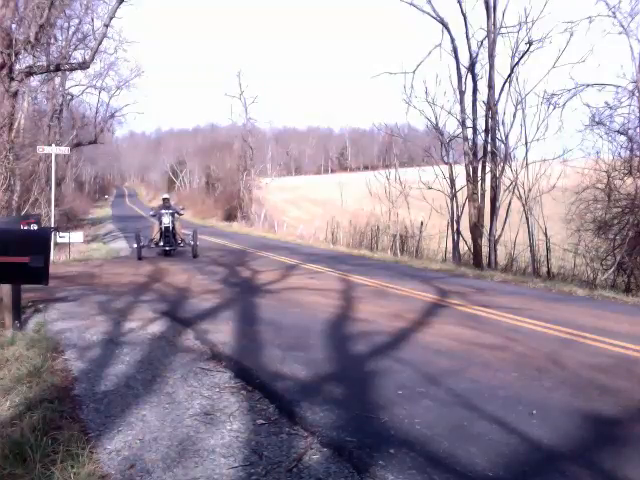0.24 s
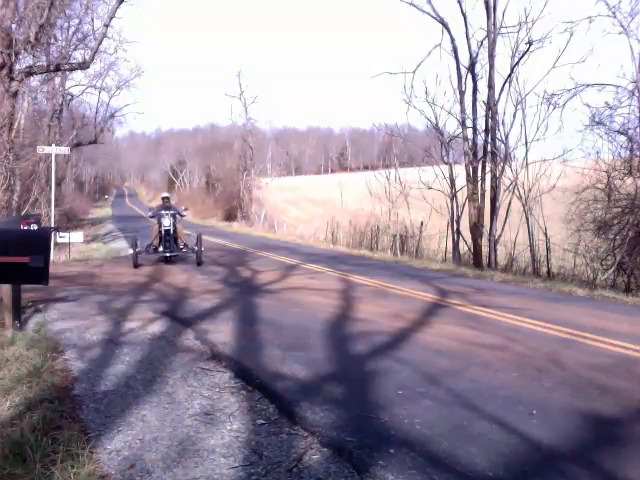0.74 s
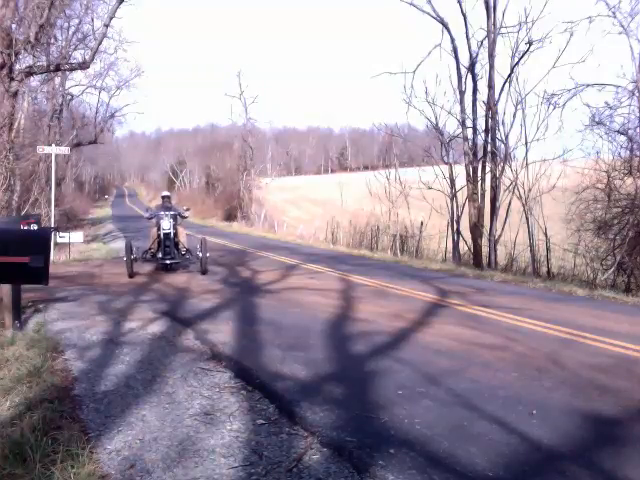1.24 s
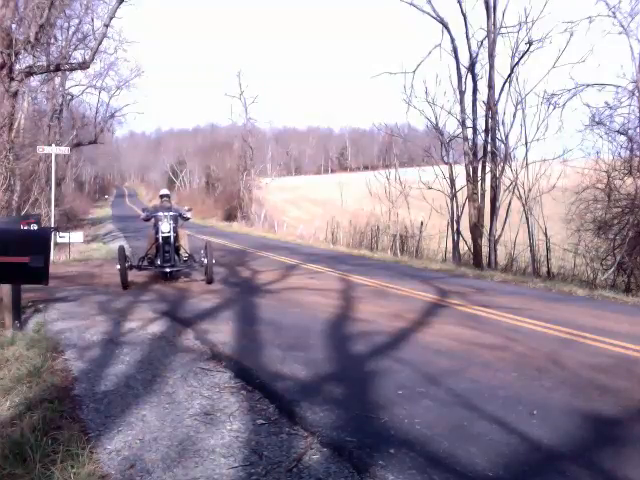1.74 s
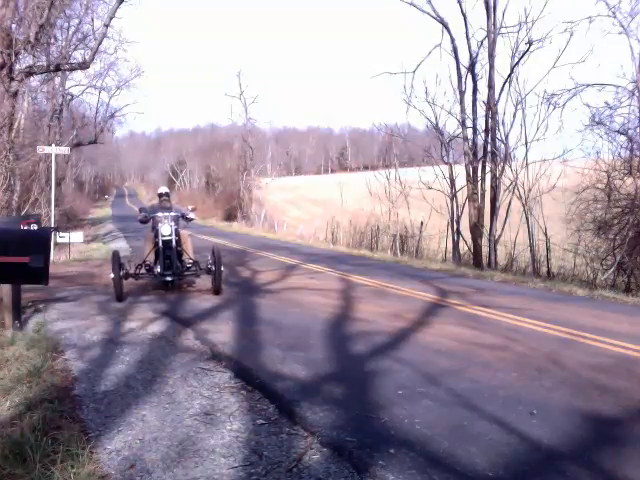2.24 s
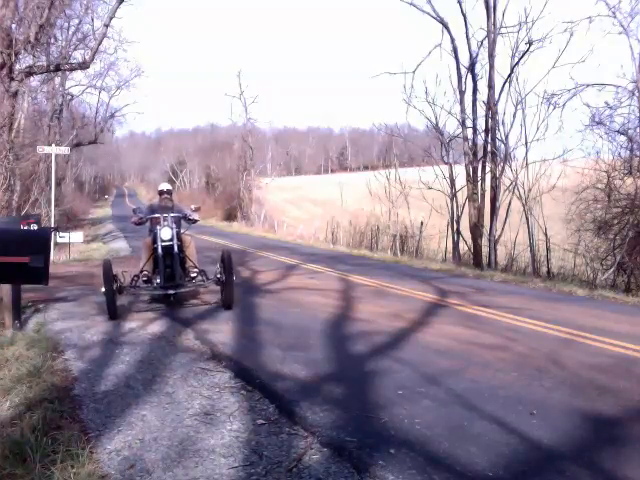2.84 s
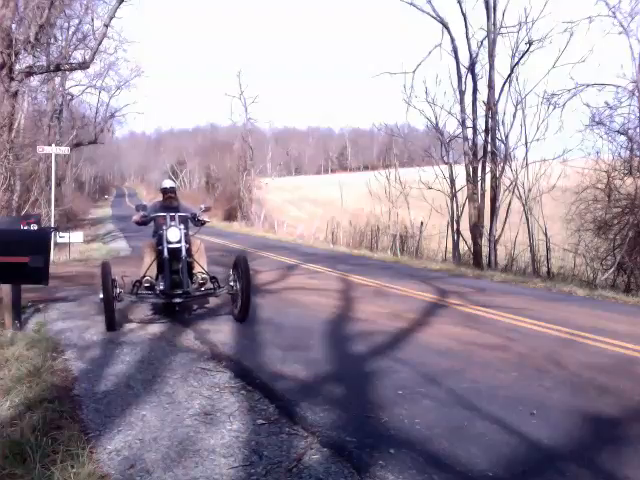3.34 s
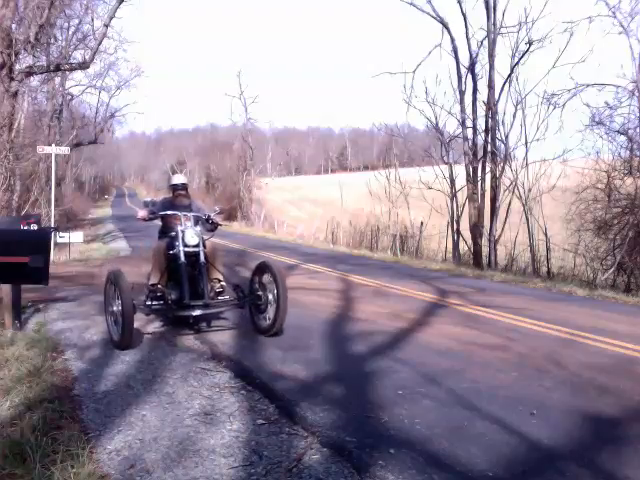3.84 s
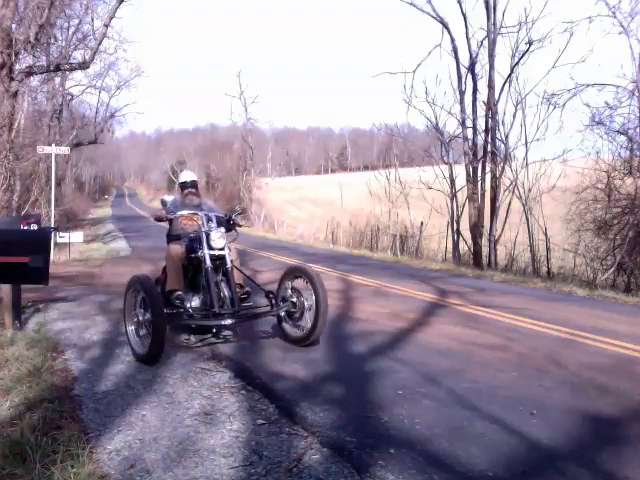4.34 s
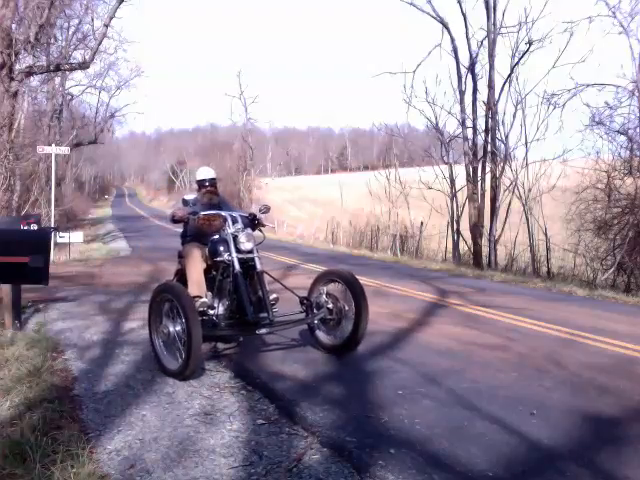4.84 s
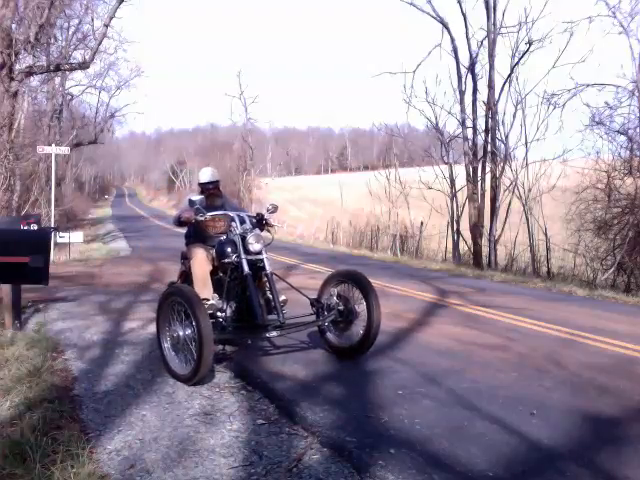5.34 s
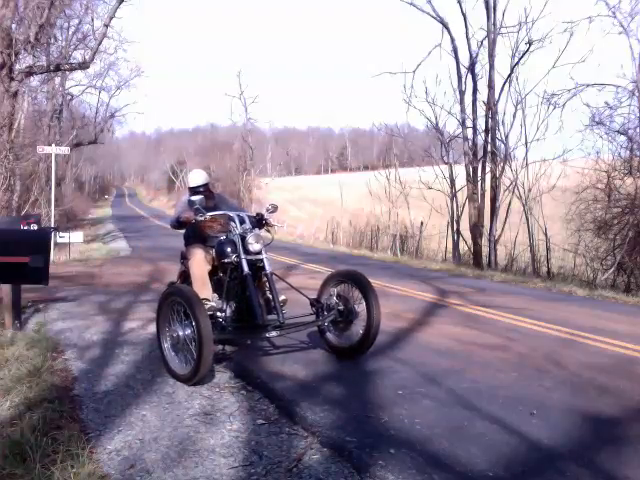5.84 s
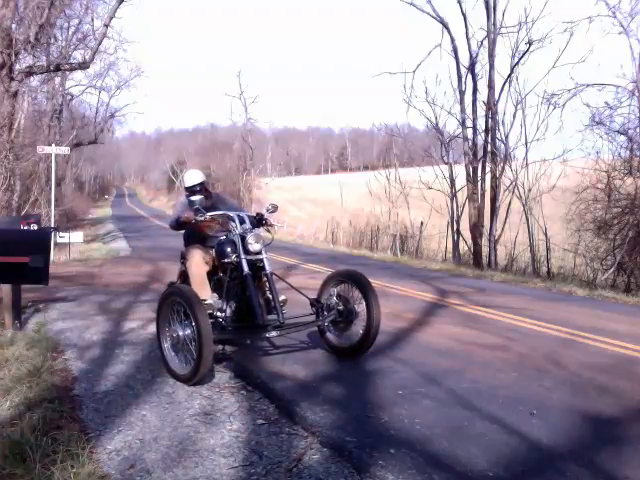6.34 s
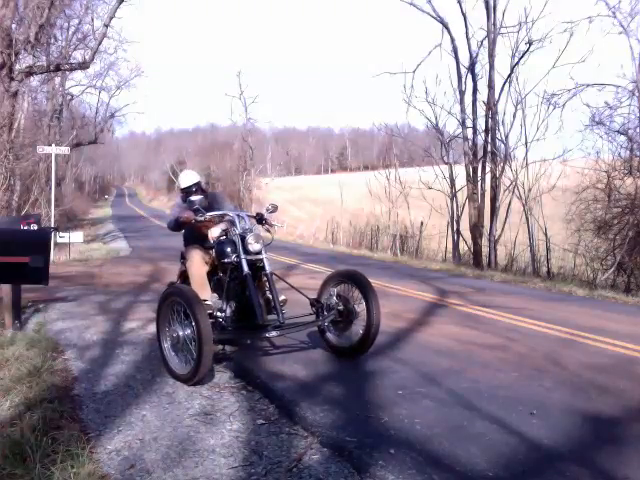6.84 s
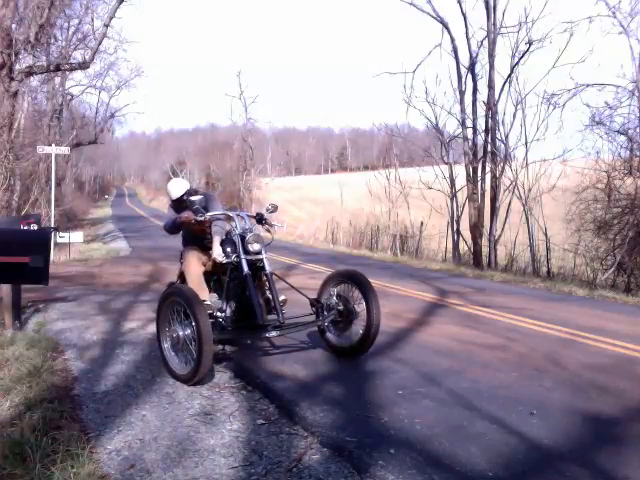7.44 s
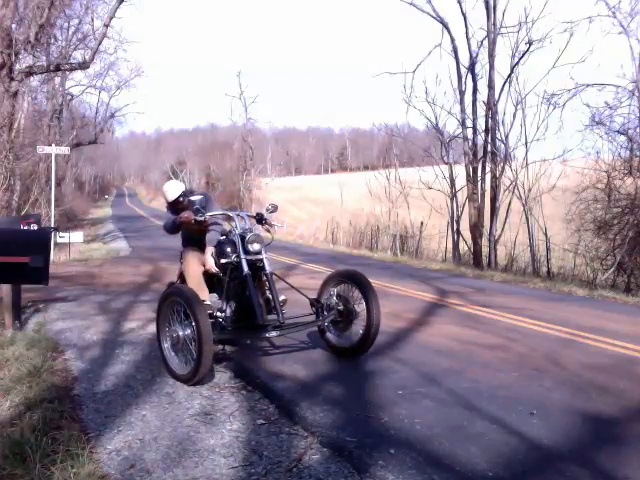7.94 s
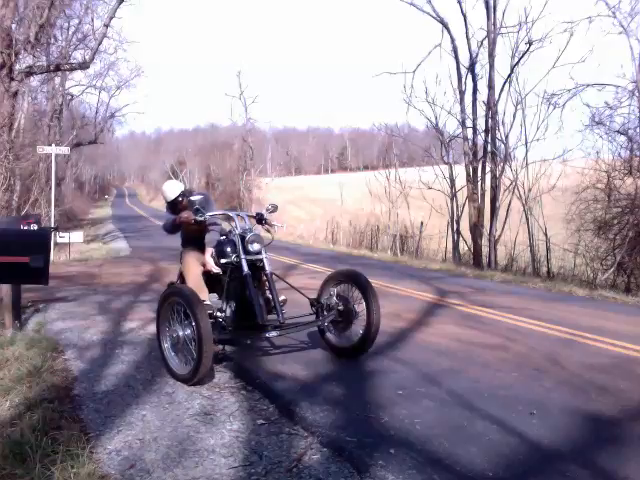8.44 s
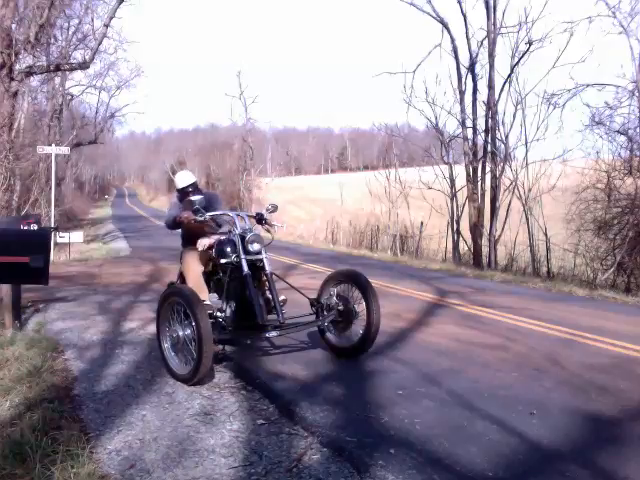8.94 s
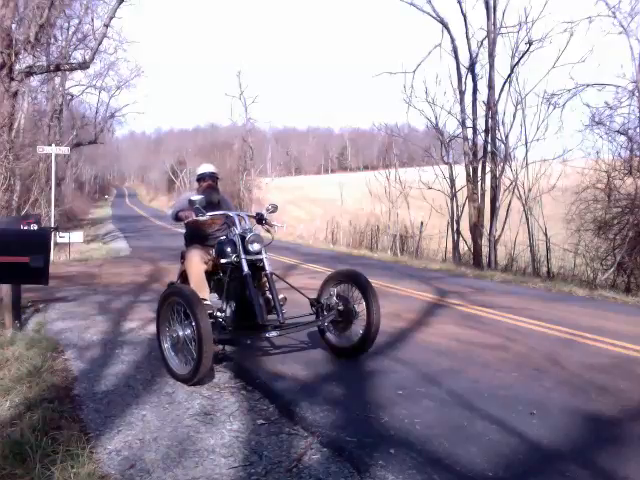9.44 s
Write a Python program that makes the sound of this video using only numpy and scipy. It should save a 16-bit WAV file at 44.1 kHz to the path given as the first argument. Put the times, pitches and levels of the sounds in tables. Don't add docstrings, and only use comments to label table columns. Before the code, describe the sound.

Uneven chugging exhaust of a big three-wheeled motorcycle approaches, roars once, idles with a limping pulse, is switched off, leaving small metallic ticks and wind.

```python
import sys
import numpy as np
from scipy import signal
from scipy.fft import rfft, irfft, next_fast_len
from scipy.io import wavfile
from scipy.ndimage import uniform_filter1d

SR = 44100
rng = np.random.default_rng(int(sys.argv[2]) if len(sys.argv) > 2 else 0)


def log_audio(samples):
    frames = np.atleast_2d(samples).T
    limited = np.clip(frames, -1, 1)
    pcm = np.round(limited * 32767).astype(np.int16)
    wavfile.write(sys.argv[1], SR, pcm)


def nominal_scale(level):
    x = np.asarray(level, float) / 20
    return 10 ** x


N = 427329
T = np.arange(N) / SR

# start_s, engine cycles a second
CRANK_SPEED = [(0, 15.227), (0.18, 17.356), (0.4, 14.95), (1.45, 9.146), (1.85, 8.873), (1.9, 9.316),
               (2.21, 6.986), (2.35, 11.071), (2.42, 9.066), (2.58, 15.871), (2.74, 20.895), (3.5, 14.794),
               (4.94, 8.733), (5.31, 8.054), (5.99, 8.291), (6.2, 7.814), (7.46, 7.911), (8.3, 0.43)]
IDLE_CYCLE_S, FIRST_TURN, REAR_TURN, STOP_S = .125, .032, .485, 8.2
# start_s, jet_db, front_pipe_db, rear_pipe_db
EFFORT = [(0, -23.5, -31.5, -30.5), (.2, -25, -32, -31.5), (.42, -36.5, -36, -31),
          (1.14, -26.5, -36.5, -36), (1.55, -27.5, -38.5, -33), (1.68, -17, -31, -34.5),
          (2.3, -19.5, -33, -32.5), (2.46, -14, -31, -28), (2.6, -11, -21, -24), (2.76, -12, -19.5, -21.5),
          (2.81, -29.5, -29, -25), (3.3, -31, -23, -28.5), (3.9, -29.5, -26.5, -20.5),
          (4.4, -24, -28.5, -22.5), (4.8, -20, -32.5, -29.5), (7.48, -21.5, -35.5, -30),
          (7.56, -40, -47, -31), (8.05, -58, -66, -60)]
# start_s, end_s
OPEN_THROTTLE = [
    (0, 0.19),
    (2.45, 2.8),
]
# start_s, end_s
LOPE = [
    (4.62, 7.15),
    (7.4, 7.5),
]
LOPE_LEAN_DB, LOPE_WARMS_S = -16, 5.28
# start_s, end_s
STUMBLE = [
    (1.55, 1.75),
    (1.9, 2.2),
]
# start_s, jet_loss_db
FRONT_MISSES = [(.004, 14), (.245, 11), (.307, 20), (.37, 5), (.509, 8), (.725, 16), (.877, 15),
                (1.233, 10.5), (1.441, 15), (1.773, 24), (1.994, 11), (2.121, 22), (2.354, 2), (2.902, 2)]
# start_s, jet_db (on the effort)
REAR_CATCHES = [(0.468, -6), (.685, -0.5), (0.84, -3.5), (1.0914, -7.5), (1.385, 5), (1.5973, -15.5),
                (1.7052, -12), (1.8208, -6.5), (1.927, -11), (2.0499, -0.5), (2.3038, 8.5), (2.4035, -17.5),
                (2.783, -1.5), (2.88, 1), (3.265, -2.5), (3.3882, -2.5), (3.733, -2), (3.8835, -5),
                (4.1167, -6), (4.374, -9.5), (4.562, -10), (5.3453, 3), (6.0783, 1.5), (7.222, -5.5)]
# start_s, pipe_note_db
REAR_HUFFS = [(.469, -0.5), (.841, 5), (1.184, -4), (2.185, -9), (5.716, 3), (6.207, 9), (6.712, -10),
              (7.345, 8)]
REAR_BURN_DB, REAR_MISS_DB, SCATTER_DB, MISS_SCATTER_DB = 0.2, -19.5, 0.55, 2.5
FRONT_PIPE_SHARE, REAR_PIPE_SHARE = 0.98, 0.34

# opening_hz, closing_hz, level_db, stroke_loss_db
FRONT_PIPE = [(195.1, 312, 0, 9.5), (82, 67, 5, 26.5), (358, 420, -10, 22)]
REAR_PIPE = [(71.5, 134.6, 2, 0.78), (239, 380, -12.5, 1.1), (148, 220, -13.5, 0.76)]
# pitch_hz, level_db, t60_s
REAR_RIM = [(1470, -15, 0.041), (2939, -7, 0.044), (3784, 0, 0.016), (4226, -14, 0.03), (5609, -11, 0.014)]
# pitch_hz, level_db (per Hz)
JET_FAR = [(290, -28.5), (500, -9), (587, -10), (1410, -7), (1950, -10), (2770, -3), (3820, -8), (4360, 4),
           (4970, -6), (5430, -1.5), (7600, -8), (12900, -11), (15600, -27), (16500, -40)]
# pitch_hz, level_db (per Hz)
JET_NEAR = [(290, -45.5), (500, -15.5), (1190, -11), (1500, 0), (2100, -10), (2610, 0.5), (3500, -8.5),
            (3880, -9), (4970, -13.5), (7380, -10), (8180, -8.5), (14500, -17), (15800, -31), (16500, -52)]
# start_s, near_share (of the near colour)
NEARNESS = [(0, 0.66), (2.9, 0.011), (4.6, 0.98), (9.7, 0.84)]
# pitch_hz, level_db (on the jet)
REAR_TINT = [(1000, 5), (1500, -1), (2100, -1.5), (3000, 3), (3900, -1.5), (4700, 0.5), (8000, -3),
             (16000, -2.5)]
# start_s, level_db (on the jet)
WHISTLE = [(0, -21), (2.9, -14.5), (3.5, 3.5), (4.3, -2), (4.9, -10.5), (7.6, -2.5)]
LEAK_S = .006

# pitch_hz, level_db (per Hz)
CLATTER = [(240, -38), (410, -4), (500, -10), (640, -11.5), (1190, -7), (1500, -7), (2110, -11.5),
           (2590, -8.5), (3120, -12), (4980, -15.5), (8190, -15.5), (14100, -24), (14800, -22.5),
           (16500, -52.5)]
# pitch_hz, level_db (per Hz)
DRONE = [(18, -48), (30, -26), (38, -15), (113, -12), (156, -7.5), (310, -10), (524, -46.5), (697, -26.5),
         (900, -24), (1170, -61), (1980, -120)]
CLATTER_DB, CLATTER_DB_PER_OCTAVE, CLATTER_OPEN_DB = -44, 9, 5
DRONE_DB, DRONE_DB_PER_OCTAVE, DRONE_OPEN_DB = -37.5 - 15, 17.5, -3
FAR_DB, ARRIVE_S, THROTTLE_LAG_S = -6.5, 2.6, 0.083
AIR_DB, AIR_HZ = -6, 8000
GRAVEL_S, GRAVEL_LENGTH_S, GRAVEL_DB = 4.35, 0.31, 2
SWITCH_OFF_S, COAST_DROP_DB, COAST_OCTAVES, REST_S = 7.52, -5, -1.65, 8.49

# start_s, pitch_hz, level_db, body_db
SQUEAK = [(9.17, 3740, -70, -89), (9.18, 3670, -48, -86), (9.192, 3590, -49, -75),
          (9.198, 3910, -36.5, -73), (9.216, 4040, -33, -52), (9.226, 4040, -50, -44.5),
          (9.243, 4020, -66, -57), (9.3, 3960, -84, -95)]
# multiple, level_db
SQUEAK_ORDERS = [(1, -3), (2, -27), (2.32, -30), (3, -26), (.66, -24), (1.33, -30)]
# start_s, peak_db, pitch_hz, t60_s
TICKS = [(8.241, -42, 2870, 0.14), (8.3703, -46, 2900, 0.089), (8.459, -54.5, 2720, 0.08),
         (8.5084, -51.5, 2830, 0.073), (8.7131, -44.5, 5400, 0.06), (8.7694, -61, 2600, 0.092),
         (9.0794, -58, 2540, 0.08), (9.1391, -46, 2510, 0.053), (9.2266, -32, 4030, 0.054),
         (9.29, -45, 2670, 0.17), (9.309, -49, 2920, 0.075), (9.5144, -46, 2440, 0.11),
         (9.5488, -50, 2440, 0.087), (9.5753, -50, 3770, 0.12), (9.5994, -53, 2660, 0.08)]
# start_s, level_db
SIZZLE = [
    (8.1, -92),
    (8.38, -76),
    (8.55, -77),
    (8.7, -87),
]
# pitch_hz, level_db (per Hz)
VALLEY = [(24, -47), (40, -17.5), (65, -27.5), (164, -16), (186, -21), (286, -20.5), (324, -11),
          (396, -30.5), (844, -25.5), (910, -24.5), (2140, -34.5), (15300, -51), (16500, -62)]
# start_s (centre), level_db, half_length_s
GUSTS = [(.5, -50, 0.31), (1.2, -42.5, .6), (2.83, -42, .2), (3.8, -46.5, 0.61), (4.16, -36, 0.27),
         (4.56, -32, .13), (4.91, -26.5, 0.096), (5.82, -36.5, 0.32), (6.69, -45, .25), (7.15, -33.5, 0.18),
         (7.95, -37, 0.22), (8.45, -45.5, .3), (9.69, -42.5, 0.39)]


def engine():
    fronts, rears, lengths = firings()
    chance = rng.standard_normal((len(lengths), 2, 9))
    front, rear, whistle, pipes = np.zeros((4, N))
    for (s, jet_db, pipe_db), cycle_s, luck in zip(fronts, lengths, chance[:, 0]):
        fired = np.clip((jet_db - pipe_db - 1.0) / 18, .05, 1)
        add(front, s - LEAK_S, nominal_scale(jet_db + 1.08) * jet(0.0077 * fired, 0.0026 + 0.013 * cycle_s))
        add(whistle, s - LEAK_S, nominal_scale(jet_db) * jet(0.0011, 0.0016, linger_db=-15.0))
        add(pipes, s + .003, nominal_scale(jet_db) * suck())
        note = pipe(FRONT_PIPE, .024 + 0.11 * cycle_s, 0.68 + 0.53 * fired, luck, .002 + .04 * cycle_s,
                    0.0051, pace(cycle_s), ring_db=-7.5)
        add(pipes, s, nominal_scale(pipe_db + 2.0) * note)
    for (s, jet_db, pipe_db), cycle_s, luck in zip(rears, lengths, chance[:, 1]):
        fired = np.clip((jet_db - pipe_db + 15.0) / 12, .15, 1)
        close = np.clip(np.interp(s, *np.transpose(NEARNESS)), 0, 1)
        hold_s = .0016 * fired + .011 * during(STUMBLE, s)
        blast = jet(hold_s, .0016 + 0.016 * cycle_s, leak_db=-17, linger_db=-10)
        add(rear, s - LEAK_S, nominal_scale(jet_db - 2.5 * close) * blast)
        add(pipes, s + .003, close * fired * nominal_scale(jet_db + 3.5) * slap(luck[4:]))
        add(pipes, s + .003, nominal_scale(jet_db) * suck())
        stroke_s = .014 + .1 * cycle_s + .9 * cycle_s ** 2
        note = pipe(REAR_PIPE, stroke_s, fired, luck, 0.0029, .0072, pace(cycle_s),
                    bend=1.25, sag=0.87, pulse_db=-2.0)
        add(pipes, s, nominal_scale(pipe_db + 1.33) * note)
    hiss = patchy(rng.standard_normal(N) * nominal_scale(2.3 * lumps(670.0)), patchy_db=2.0)
    near = np.clip(curve(NEARNESS), 0, 1)
    hiss = np.sqrt(1 - near) * coloured(hiss, JET_FAR) + np.sqrt(near) * coloured(hiss, JET_NEAR)
    dull = coloured(hiss, REAR_TINT)
    shrill_bands = [(6000, -41.5), (7500, -26.0), (8200, 2.5), (8900, -12.5), (10500, -30)]
    shrill = coloured(rng.standard_normal(N), shrill_bands)
    jets = front * evened(hiss) + rear * dull + whistle * nominal_scale(curve(WHISTLE)) * shrill
    jets = signal.lfilter(*signal.butter(2, 950., "high", fs=SR), jets)
    return jets + signal.lfilter(*signal.butter(2, 48., "high", fs=SR), pipes)


def firings():
    turns = np.cumsum(curve(CRANK_SPEED)) / SR
    cycles = np.arange(int(turns[round(STOP_S * SR)] - REAR_TURN) + 1)
    front_s = np.interp(cycles + FIRST_TURN, turns, T)
    rear_s = np.interp(cycles + FIRST_TURN + REAR_TURN, turns, T)
    lengths = np.diff(np.interp(np.r_[cycles, len(cycles) - .2] + FIRST_TURN, turns, T))
    luck = rng.standard_normal((len(cycles), 4))
    front_db = np.zeros(len(cycles))
    for s, lost_db in FRONT_MISSES:
        front_db[np.argmin(abs(front_s - s))] = -lost_db
    lean_db = LOPE_LEAN_DB * np.clip((LOPE_WARMS_S - rear_s) / (LOPE_WARMS_S - LOPE[0][0]), 0, 1)
    loping = during(LOPE, rear_s) & ((cycles % 2 == 0) | (rear_s > LOPE[1][0]))
    rear_db = np.where(loping, lean_db + REAR_BURN_DB, REAR_MISS_DB + MISS_SCATTER_DB * luck[:, 0])
    every_time = during(OPEN_THROTTLE, rear_s) | (rear_s > LOPE[1][1])
    rear_db = np.where(every_time, REAR_BURN_DB, rear_db)
    for s, db in REAR_CATCHES:
        k = np.argmin(abs(rear_s - s))
        rear_s[k], rear_db[k] = s, db
    slow = np.clip(1 - pace(lengths), 0, 1)
    at, jet_db, front_pipe_db, rear_pipe_db = np.transpose(EFFORT)
    front_jet = np.interp(front_s, at, jet_db) + front_db + SCATTER_DB * luck[:, 1]
    front_note = np.interp(front_s, at, front_pipe_db) + FRONT_PIPE_SHARE * front_db * slow
    rear_jet = np.interp(rear_s, at, jet_db) + rear_db
    rear_note = np.interp(rear_s, at, rear_pipe_db) + REAR_PIPE_SHARE * rear_db * slow
    front = np.c_[front_s, front_jet, front_note + SCATTER_DB * luck[:, 2]]
    rear = np.c_[rear_s, rear_jet, rear_note + SCATTER_DB * luck[:, 3]]
    for s, db in REAR_HUFFS:
        rear[np.argmin(abs(rear_s - s)), 2] += db
    return front, rear, lengths


def pace(cycle_s):
    return np.clip(IDLE_CYCLE_S / cycle_s - 1, -.3, 1.6)


def jet(hold_s, rise_s, leak_db=-27.0, linger_db=-9.0):
    t = np.arange(3500) / SR
    late = np.maximum(t - rise_s - hold_s, 0)
    swell = nominal_scale(5.0 * (np.minimum(t / (rise_s + hold_s), 1) - 1.5))
    fall = nominal_scale(-2972.0 * late) + nominal_scale(linger_db - 702.0 * late)
    blast = np.minimum(t / rise_s, 1) ** 0.72 * swell * fall
    leak = nominal_scale(leak_db) * np.linspace(0, 1, round(LEAK_S * SR)) ** 2
    return np.r_[leak, np.maximum(blast, nominal_scale(leak_db) * (t < rise_s))]


def pipe(partials, stroke_s, fired, chance, delay_s, peak_s, pace, ring_db=-10.5, sag=0.95, bend=0.92,
         pulse_db=-3.0):
    t = np.arange(round((stroke_s + .08) * SR)) / SR
    u = t / stroke_s
    stroke = np.minimum(u, 1)
    open_valve = 1 / (1 + np.exp(np.clip((u - 1) * 14, -50, 50)))
    start = fired + (1 - fired) * stroke ** 1.5
    ring = nominal_scale(ring_db - 223.5 * np.maximum(t - stroke_s, 0))
    heat = 1 + 0.037 * pace + .07 * pace * max(fired - .6, 0) / .4
    out = np.zeros(len(t))
    for k, (low_hz, high_hz, db, lost_db) in enumerate(partials):
        low_hz = low_hz * (heat + 0.041 * pace)
        top_hz = high_hz * (heat + .012 * chance[k])
        glide = low_hz + (top_hz - low_hz) * stroke ** bend
        hz = open_valve * glide + (1 - open_valve) * sag * top_hz
        load_db = 17.0 * max(fired - .75, -.2) if low_hz > 200 else -3.0
        level_db = db + pace * (k > 0) * load_db + chance[k + 3] - (lost_db - 2.4 * pace) * stroke
        level = nominal_scale(level_db) * (open_valve + (1 - open_valve) * ring)
        turns = np.cumsum(hz) / SR
        phase = turns - np.interp(peak_s, t, turns) + 0.023 * k * chance[k + 6]
        out += level * np.cos(2 * np.pi * phase)
    kick = np.exp(-((t - peak_s) / 0.0009) ** 2) - 0.4 * np.exp(-((t - 0.54 * peak_s) / 0.001) ** 2)
    out = np.sqrt(2) * out * start * np.minimum(t / 0.0017, 1) + fired ** 3 * nominal_scale(pulse_db) * kick
    return np.r_[np.zeros(round(delay_s * SR)), out * np.minimum((t[-1] - t) / .02, 1)]


def slap(chance):
    t = np.arange(2000) / SR
    ring = np.zeros(len(t))
    for (hz, db, t60), c in zip(REAR_RIM, chance):
        decay = nominal_scale(db + 2.5 * c - 60 * t / (.7 * t60))
        ring += decay * np.sin(2 * np.pi * hz * (1 + .035 * c) * t)
    return -ring * np.minimum(t / .001, 1)


def suck():
    return -nominal_scale(-13) * np.exp(-(np.arange(-150, 150) / SR / 0.00097) ** 2)


def running_gear():
    rattle = patchy(rng.standard_normal(N) * nominal_scale(1.2 * lumps(140.0)), patchy_db=3.5)
    octaves = np.maximum(np.log2(curve(CRANK_SPEED) * IDLE_CYCLE_S), COAST_OCTAVES)
    opened = 1. * during(OPEN_THROTTLE, T - THROTTLE_LAG_S / 2)
    opened = uniform_filter1d(opened, round(THROTTLE_LAG_S * SR))
    far = np.clip(1 - T / ARRIVE_S, 0, 1)
    gravel_db = GRAVEL_DB * np.exp(-((T - GRAVEL_S) / GRAVEL_LENGTH_S) ** 2)
    coast_db = COAST_DROP_DB * np.clip((T - SWITCH_OFF_S) / 0.32, 0, 1)
    drone_db = DRONE_DB + DRONE_DB_PER_OCTAVE * octaves + DRONE_OPEN_DB * opened
    clatter_db = CLATTER_DB + CLATTER_DB_PER_OCTAVE * octaves + CLATTER_OPEN_DB * opened
    clatter_db = clatter_db + FAR_DB * far + gravel_db + coast_db
    drone = coloured(rng.standard_normal(N), DRONE) * nominal_scale(drone_db)
    clatter = coloured(rattle, CLATTER)
    top = signal.sosfiltfilt(signal.butter(2, AIR_HZ, "high", fs=SR, output="sos"), clatter)
    clatter = clatter - top * (1 - nominal_scale(AIR_DB * far))
    fade = np.clip((REST_S - T) / 0.35, 0, 1)
    return (clatter * nominal_scale(clatter_db - 2.0) + drone) * fade


def squeak():
    turns = np.cumsum(curve(SQUEAK) * (1 + 0.00605 * lumps(300.))) / SR
    level_db = curve(SQUEAK, column=2)
    bite = np.minimum(nominal_scale(level_db + 49), 1)
    tone = np.zeros(N)
    for k, db in SQUEAK_ORDERS:
        tone += nominal_scale(db) * bite ** (2 * (k != 1)) * np.sin(2 * np.pi * k * turns)
    tone *= nominal_scale(level_db + 1.5 * lumps(270.0))
    late = T - 9.2
    body = np.sin(2 * np.pi * (1230. - 600 * late) * late) * nominal_scale(curve(SQUEAK, column=3))
    body *= nominal_scale(2.3 * lumps(153.0))
    return np.sqrt(2) * (tone + body) * (T > SQUEAK[0][0]) * (T < SQUEAK[-1][0])


def ticks():
    out, t = np.zeros(N), np.arange(4000) / SR
    for (s, db, hz, t60), noise in zip(TICKS, rng.standard_normal((len(TICKS), 4000))):
        bands = [(900, -35), (2000, -28), (0.77 * hz, -6), (hz, 0), (1.4 * hz, -10), (4800, -17),
                 (5400, -10), (6300, -18), (7300, -13), (13000, -24), (16000, -40)]
        tone = coloured(noise, sorted(bands))
        scrape = nominal_scale(2.1 * evened(uniform_filter1d(noise[::-1], 90)))
        decay = nominal_scale(db - 10.5 - 60 * t / max(t60, .01)) * np.minimum(t / 0.0037, 1)
        add(out, s, decay * tone * scrape)
    return out


def sizzle():
    bands = [(4800, -45), (5500, -1.5), (6200, -28.5), (8300, -33.0), (9100, 2), (9900, -40.0)]
    return coloured(rng.standard_normal(N), bands) * nominal_scale(curve(SIZZLE) + 3.0 * lumps(12.))


def roadside(x):
    t = np.arange(9000) / SR
    tail = rng.standard_normal(len(t)) * nominal_scale(-60 * t / .3) * (t > .012)
    tail = signal.lfilter(*signal.butter(1, 6000., fs=SR), tail)
    return signal.fftconvolve(x, tail / np.linalg.norm(tail))[:N]


def wind():
    level = nominal_scale(-53) + sum(nominal_scale(db) * np.exp(-((T - s) / half_s) ** 2) for s, db, half_s in GUSTS)
    bands = [(2, -12.0), (8, -4.5), (14, -15.0), (30, -29.5), (60, -43.5), (200, -75.0)]
    return coloured(rng.standard_normal(N), bands) * level


def valley():
    return nominal_scale(-66.5) * coloured(rng.standard_normal(N), VALLEY) * nominal_scale(0.76 * lumps(2.2))


def evened(x):
    return x / np.sqrt(np.mean(x ** 2) + 1e-20)


def curve(rows, column=1):
    columns = np.transpose(rows)
    return np.interp(T, columns[0], columns[column])


def during(spans, s):
    return np.any([(s >= a) & (s < b) for a, b in spans], axis=0)


def add(mix, s, sound):
    part = mix[max(round(s * SR), 0):][:len(sound)]
    part += sound[:len(part)]


def coloured(x, points):
    f, db = np.transpose(points)
    size = next_fast_len(len(x))
    hz = np.fft.rfftfreq(size, 1 / SR)
    gain = nominal_scale(np.interp(np.log(hz + 1), np.log(f + 1), db))
    return evened(irfft(rfft(x, size) * gain, size)[:len(x)])


def lumps(hz):
    return evened(signal.sosfilt(signal.butter(2, hz, fs=SR, output="sos"), rng.standard_normal(N)))


def patchy(x, patchy_db):
    z = signal.stft(x, nperseg=256, noverlap=192)[2]
    patches = uniform_filter1d(rng.standard_normal(z.T.shape).T, 6, 1)
    patches = uniform_filter1d(patches, 5, 0)
    return evened(signal.istft(z * nominal_scale(patchy_db * evened(patches)), nperseg=256, noverlap=192)[1][:len(x)])


def scene():
    trike = engine() + squeak() + ticks()
    around = nominal_scale(-21.5) * roadside(trike) + running_gear() + valley() + sizzle()
    around = signal.sosfilt(signal.butter(8, 13900., fs=SR, output="sos"), around)
    return (trike + around + wind())[None]


def top_cut(x):
    return signal.sosfilt(signal.butter(12, 16650, fs=SR, output="sos"), x)


def record(dry):
    treble = signal.lfilter(*signal.butter(1, 900., "high", fs=SR), dry)
    combed = dry + 0.18 * np.roll(treble, 33, axis=1)
    limited = signal.oaconvolve(combed, signal.firwin(255, 15900., fs=SR)[None], "same")
    overload = .95
    mix = overload * np.tanh(limited / overload) + .001
    return top_cut(mix)


dry = scene()
out = record(dry)
log_audio(out)
```